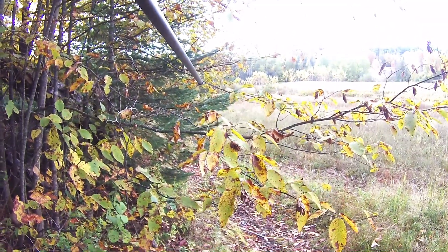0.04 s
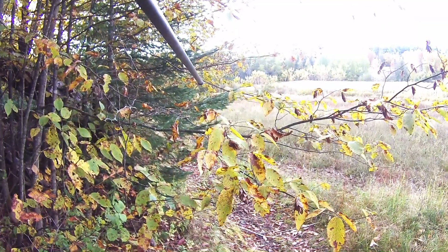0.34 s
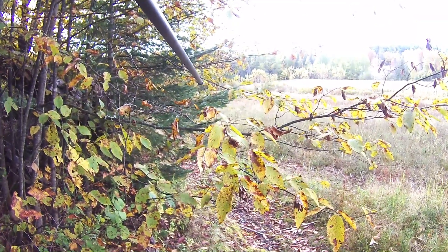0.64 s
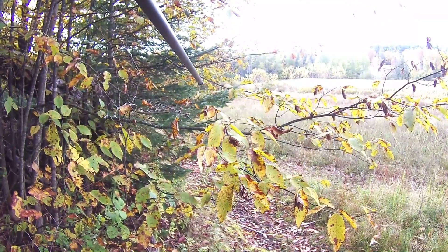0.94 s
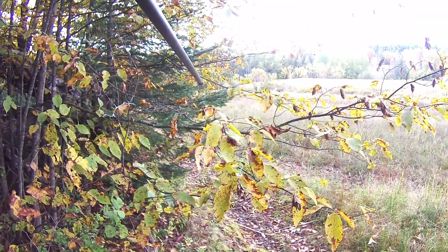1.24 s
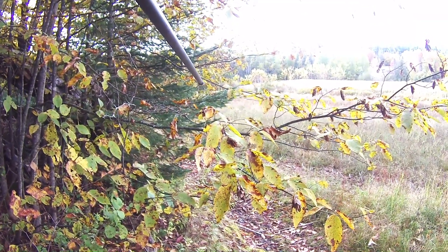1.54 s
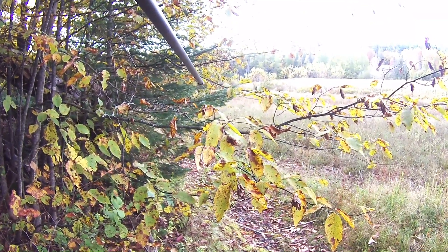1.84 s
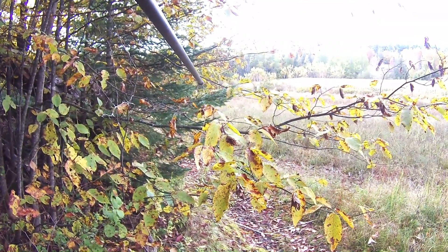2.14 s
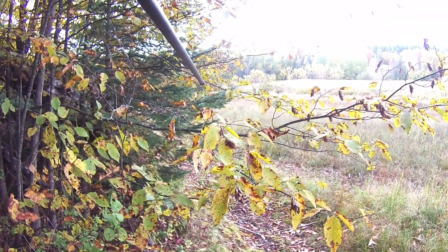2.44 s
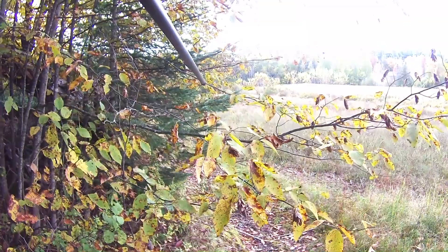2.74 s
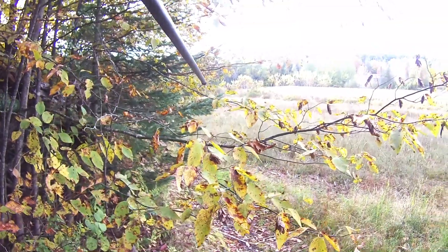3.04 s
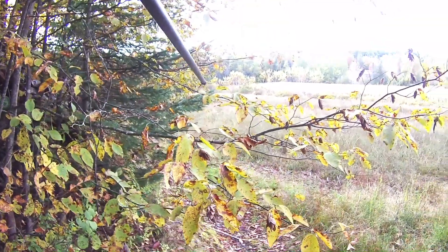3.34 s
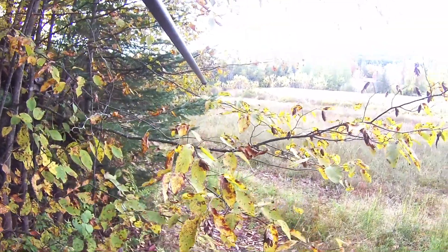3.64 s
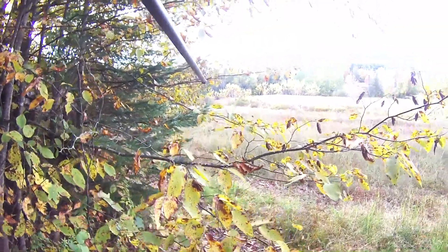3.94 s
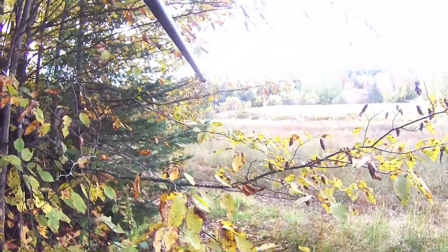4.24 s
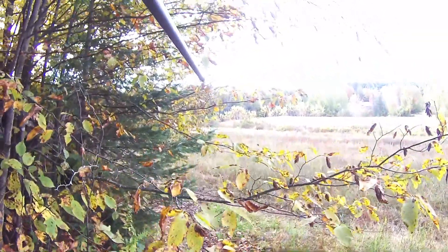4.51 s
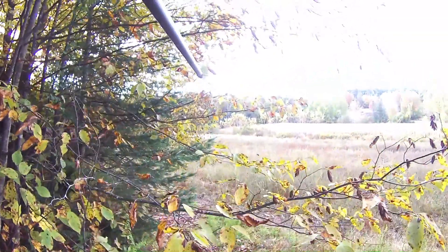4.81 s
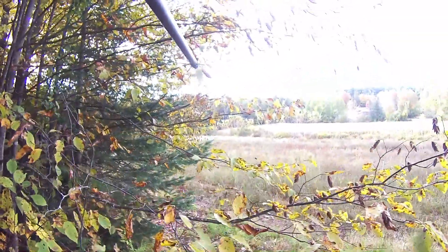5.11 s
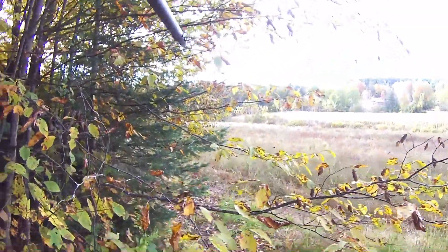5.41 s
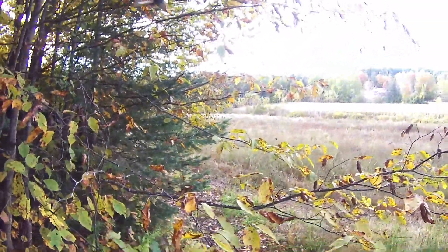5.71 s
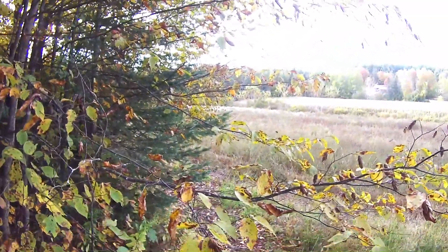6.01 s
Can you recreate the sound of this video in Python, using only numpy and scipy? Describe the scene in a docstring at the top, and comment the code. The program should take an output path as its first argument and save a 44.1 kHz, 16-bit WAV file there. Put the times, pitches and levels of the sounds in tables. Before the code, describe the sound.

An arrow slides back with a ringing hiss as a bow is drawn, ending in loud creaks and knocks, over faint traffic and wind.

```python
"""A bow is drawn at the edge of a wood, heard from a microphone fixed to it.
At first there are only far traffic, low wind, a cricket and a few small birds. From 2.5 s a sleeve
rustles, and sliding friction on the rest makes the arrow hiss and ring at its shaft's resonances.
The hand shifts on the grip, and near 5 s the shaft briefly sings. Towards full draw, impacts excite
the bow's modes: it creaks and knocks hard enough to overload the microphone."""
import sys
import numpy as np
from scipy import signal
from scipy.fft import rfft, irfft, next_fast_len
from scipy.io import wavfile

SR = 44100
rng = np.random.default_rng(int(sys.argv[2]) if len(sys.argv) > 2 else 0)


def store_pcm(level_fs):
    """Save levels as 16-bit WAV."""
    pcm = np.round(np.clip(level_fs, -1, 1) * 32767).astype(np.int16)
    wavfile.write(sys.argv[1], SR, np.atleast_2d(pcm).T)


N = 267687
T = np.arange(N) / SR


# friction following the speed of the draw, in three pulls: (time [s], relative level [dB])
DRAW_FRICTION = [(2.72, -54), (2.88, -48), (3.22, -50.5), (3.33, -53.5), (3.62, -53.5), (3.76, -49.5),
                 (4.1, -48.5), (4.35, -50.5), (5.1, -45.0), (5.45, -44.5), (5.7, -46.5)]
# hiss on the rest: (frequency [Hz], relative spectral density [dB])
HISS_SPECTRUM = [(1400, -20), (2300, -9), (3200, 1), (4500, 3.5), (5500, -0.5), (7000, -6), (9000, -11),
                 (10500, -18), (12000, -19), (15000, -39)]
# main shaft resonances: (frequency [Hz], bandwidth [Hz], gain [dB])
SHAFT_MODES = [(1721, 62, 15.5), (1862, 35, 5.5)]
# higher shaft resonances: (frequency [Hz], bandwidth [Hz], gain [dB])
SHAFT_OVERTONES = [(2606, 190, 1.5), (3182, 130, 4), (4460, 130, -2.5), (5300, 240, 3), (5400, 42, -10),
                   (5970, 140, -5), (7000, 470, -4), (7800, 170, -8.5), (9400, 240, -8),
                   (11670, 1660, -9.5)]

def arrow(start_s=2.43, onset_s=0.18, full_draw_s=6, decay_s=0.93, hiss_db=-1, overtone_db=1, shaft_db=-1):
    """Forced vibration: sliding friction on the rest hisses and drives the modes of the hollow shaft."""
    onset = np.clip((T - start_s) / onset_s, 0, 1)
    fade = np.exp(-np.maximum(T - full_draw_s, 0) / decay_s)
    sliding = from_db(in_time(DRAW_FRICTION)) * onset * fade
    grain = from_db(1.25 * drift(90))
    friction = resonance(rng.standard_normal(N) * grain, hz=1770, width=450)
    shaft = rms_one(sum(from_db(db) * resonance(friction, hz, width) for hz, width, db in SHAFT_MODES))
    # the contact passes the nodes of each overtone, so they swell and fade in turn
    overtones = np.zeros(N)
    for hz, width, db in SHAFT_OVERTONES:
        overtones += from_db(db + 1.8 * drift(11)) * resonance(grain * rng.standard_normal(N), hz, width)
    # further into the draw, more of the friction goes into ringing and less into plain hiss
    ring_share = np.interp(T, [2.7, 5.2], [.12, .65])
    hiss = from_db(hiss_db) * np.sqrt(1 - ring_share) * rms_one(grain * coloured_noise(HISS_SPECTRUM))
    ringing = from_db(overtone_db) * np.sqrt(ring_share) * rms_one(overtones)
    return sliding * (hiss + ringing) + from_db(shaft_db) * shaft_gain(sliding) * shaft


# the shaft catches on the rest: (time [s], relative level [dB])
SHAFT_CATCHES = [(2.89, -49), (3.08, -56), (3.22, -49), (3.47, -46), (3.77, -43), (3.99, -43), (4.08, -43),
                 (4.31, -42.5), (4.55, -40), (4.99, -40), (5.27, -39)]

def shaft_gain(sliding, coupling_db=4.0, antinode_s=4.57, antinode_half_s=0.52, catch_half_s=0.026):
    """Modal coupling: friction drives the main ring most at its antinode, and each catch swells it."""
    coupling = from_db(coupling_db + drift(20)) / np.hypot(1, (T - antinode_s) / antinode_half_s)
    catches = swells([(s, db, catch_half_s) for s, db in SHAFT_CATCHES])
    return np.hypot(sliding * coupling, catches)


def squeal(at_s=5.07, half_s=0.059, pitch_hz=2670, level_db=-50):
    """Sharp resonance: the shaft briefly sings on one overtone."""
    band = resonance(rng.standard_normal(N), pitch_hz, width=90)
    tone = rms_one(resonance(band, pitch_hz, width=78))
    return swells([(at_s, level_db, half_s)]) * tone


# impacts in the bow: (time [s], strength [dB], low-mode boost [dB], relative rebound [dB])
BOW_IMPACTS = [(5.404, -23, 7, -10), (5.425, -21.5, 5, -8), (5.473, -20, 3, -8), (5.509, -22, 13, -13),
               (5.56, -16, 8.5, -6.5), (5.727, -17, 1, -9), (5.7365, -7, 2.5, 0), (5.7669, 3, -0.5, -9),
               (5.7764, 2.5, -2, -24), (5.790, -9, -7, -25), (5.7997, -9.5, 2, -0.5), (5.826, -9.5, 8, -22),
               (5.8621, -10, 8, 2), (5.899, -19, 11, -6), (5.949, -16.5, 3, -5), (6.0001, -4, 6.5, -20),
               (6.042, -15.5, -10, -11), (6.0665, -10, -10, -10)]
# modes of bow and microphone mount: (frequency [Hz], gain [dB], 60 dB decay time [s])
BOW_MODES = [(72, -34.5, 0.14), (213.5, -21, 0.075), (326, -25.5, 0.015), (805, -6, 0.043),
             (909, -11, 0.045), (1300, -8, 0.009), (1540, -7, 0.011), (1760, -9.5, 0.018),
             (2940, -17, 0.022), (3420, -19, 0.029), (4020, -24, 0.029), (4320, -10, 0.015),
             (4840, -25, 0.0059), (6780, -25, 0.0046), (10300, -13, .005)]

def knocks(rebound_s=0.00365, contact_hz=2420, doubling_db=19, thud_below_hz=400, chatter_s=0.0025):
    """Impact excitation: each contact and its rebound ring the modes; harder is shorter and brighter."""
    t = np.arange(2048) / SR
    force = np.zeros((len(BOW_MODES), N + len(t)))
    is_low = np.array(BOW_MODES)[:, 0] < thud_below_hz
    rebounds = [(s + rebound_s, db + rebound_db, thud_db) for s, db, thud_db, rebound_db in BOW_IMPACTS]
    for s, db, thud_db in [row[:3] for row in BOW_IMPACTS] + rebounds:
        contact = (t == 0) + 0.059 * rng.standard_normal(len(t)) * np.exp(-t / chatter_s)
        bright_hz = min(contact_hz * 2 ** (db / doubling_db), SR / 3)
        push = signal.sosfilt(signal.butter(2, bright_hz, fs=SR, output="sos"), contact)
        spot_db = 2 * rng.standard_normal(len(BOW_MODES))  # where it lands sets each mode's share
        shares = from_db(db + thud_db * is_low + spot_db)
        at = min(round(s * SR), N)
        force[:, at:at + len(t)] += np.outer(shares, push)
    return mount(sum(from_db(db) * ring(f[:N], hz, t60) for f, (hz, db, t60) in zip(force, BOW_MODES)))


def mount(x, bend_hz=1500, bend_width_hz=1300, muffle_hz=4300):
    """Dispersion spreads bending waves in time; the mount adds an antiresonance, the housing muffles."""
    r = np.exp(-np.pi * bend_width_hz / SR)
    poles = [1, -2 * r * np.cos(2 * np.pi * bend_hz / SR), r * r]
    for _ in range(2):  # all-pass stages
        x = signal.lfilter(poles[::-1], poles, x)
    notched = x - .85 * resonance(x, hz=2280, width=560)
    return signal.sosfilt(signal.butter(1, muffle_hz, fs=SR, output="sos"), notched)


# the hand shifts on the grip: (time [s], level [dB], half-width [s])
HAND_SHIFTS = [(3.5, -41.5, 0.036), (3.85, -48, 0.074), (4.22, -47, 0.065), (5.55, -35.5, 0.075),
               (5.84, -27, .052), (6.04, -38, .04)]
# rumble of the grip: (frequency [Hz], relative spectral density [dB])
GRIP_SPECTRUM = [(20, 0.5), (36, 5.5), (70, -22), (130, -10), (215, -3.5), (300, -19), (500, -14.5),
                 (820, -22.5), (1200, -20), (2500, -53)]

def grip(shudder_db=2.0):
    """Structure-borne sound: each shift of the hand sends an uneven rumble through the loaded bow."""
    shudder = from_db(shudder_db * drift(50))
    return swells(HAND_SHIFTS) * rms_one(shudder * coloured_noise(GRIP_SPECTRUM))


# rustles, from soft brushes to sharp ticks: (time [s], level [dB], half-width [s])
SLEEVE_RUSTLES = [(2.5475, -42, .0004), (2.5585, -36, .0003), (2.569, -35, .0003), (2.584, -32, .0003),
                  (2.66, -53, .008), (3.21, -51, .02), (3.388, -42, .0005), (3.47, -39, .0008),
                  (3.476, -37, .0006), (3.4947, -31, .0004), (3.498, -37, .0013)]
# rubbing cloth: (frequency [Hz], relative spectral density [dB])
CLOTH_SPECTRUM = [(1500, -16), (3000, -2), (6000, 0), (9000, -6), (12000, -6), (15000, -12)]

def sleeve(grain_db=3):
    """Friction noise: the fibres of stiff cloth give grainy brushes and crisp ticks."""
    fibres = from_db(grain_db * drift(900))
    return swells(SLEEVE_RUSTLES) * rms_one(fibres * coloured_noise(CLOTH_SPECTRUM))


# contact calls: (time [s], duration [s], start pitch [Hz], end pitch [Hz], relative level [dB])
BIRD_NOTES = [(.69, .1, 8350, 8150, -59), (.69, .09, 7500, 7450, -59), (0.933, 0.036, 5430, 4970, -45.5),
              (1.631, .025, 4450, 3620, -44.5), (1.92, .09, 8070, 7950, -55)]

def birds(gain_db=-2.0, waver_hz=90, echo_db=-4.5, echo_s=.12):
    """Frequency modulation makes thin, unsteady notes; scattering by the trees adds a faint tail."""
    notes, waver = np.zeros(N), waver_hz * drift(250)
    for s, length, start_hz, end_hz, db in BIRD_NOTES:
        along = np.clip((T - s) / length, 0, 1)
        phase = 2 * np.pi * np.cumsum(start_hz + (end_hz - start_hz) * along + waver) / SR
        notes += from_db(db + gain_db) * np.sin(np.pi * along) * np.sin(phase)
    trees = (rng.standard_normal(N) * np.exp(-T / echo_s))[:SR // 2]
    echo = signal.fftconvolve(notes, trees / np.linalg.norm(trees))[:N]
    return notes + from_db(echo_db) * echo


def cricket(level_db=-55.5, pitch_hz=4350, fall_hz=1600, strokes_per_s=38):
    """Stridulation: each wing stroke is a short falling tone."""
    stroke = np.cumsum(strokes_per_s * (1 + .2 * drift(30))) / SR % 1
    phase = 2 * np.pi * np.cumsum(pitch_hz + fall_hz * (.5 - stroke) + 60 * drift(40)) / SR
    swell = np.sin(np.pi * stroke) ** 6 * from_db(2 * drift(25))
    return from_db(level_db) * swell * np.sin(phase)


# roar of the far road: (time [s], relative level [dB])
ROAD_LEVEL = [(0.0, -39.5), (0.73, -38), (1.03, -39.5), (2.64, -38.5), (3.17, -43.5), (4.1, -45),
              (5.35, -41.5)]
# distant tyres: (frequency [Hz], relative spectral density [dB])
TYRE_SPECTRUM = [(200, -34), (330, -19.5), (410, -6.5), (500, -8.5), (670, 1), (800, -1), (900, -1.5),
                 (1050, -1.5), (1250, -21), (1700, -42.5)]

def traffic(gain_db=0.1, waver_db=0.7, drone_db=-52, nearest_s=2.74, passing_s=0.66):
    """Spherical spreading: over the tyre roar, one passing drone varies inversely with distance."""
    tyre_db = in_time(ROAD_LEVEL) + gain_db + waver_db * drift(14)
    tyres = from_db(tyre_db) * coloured_noise(TYRE_SPECTRUM)
    drone = rms_one(resonance(rng.standard_normal(N), hz=412, width=45))
    distance = np.hypot(1, (T - nearest_s) / passing_s)  # 1 at closest approach
    return tyres + from_db(drone_db) * drone / distance


# wind and leaves: (frequency [Hz], relative spectral density [dB])
WIND_SPECTRUM = [(20, -1), (33, 3), (52, -4), (78, 1.5), (110, -5.5), (220, -10), (1400, -17),
                 (2300, -22.5), (4400, -25), (6000, -29.5), (9500, -34.5), (11500, -35), (15000, -55)]

def wind(level_db=-43.5):
    """Stationary broadband noise: low wind with a hiss of leaves."""
    return from_db(level_db) * coloured_noise(WIND_SPECTRUM)


def from_db(db):
    """Decibels to amplitude ratio."""
    return 10 ** (np.asarray(db) / 20)


def rms_one(x):
    """Normalisation to unit power."""
    return x / np.sqrt(np.mean(x ** 2) + 1e-20)


def in_time(rows):
    """Linear interpolation of (time [s], level [dB]) at every sample."""
    return np.interp(T, *np.transpose(rows))


def swells(rows):
    """Gaussian envelopes from (time [s], level [dB], half-width [s]); a half-width is one sigma."""
    return sum(from_db(db) * np.exp(-.5 * ((T - s) / half) ** 2) for s, db, half in rows)


def drift(rate):
    """Random modulation of unit power, through `rate` new values a second."""
    knots = rng.standard_normal(4096)
    return rms_one(np.interp(T * rate, np.arange(len(knots)), knots))


def coloured_noise(spectrum):
    """Spectral shaping of white noise, rolled off below 10 Hz and scaled to unit power."""
    hz, db = np.transpose(spectrum)
    size = 2 * next_fast_len(N)
    bins = np.maximum(np.fft.rfftfreq(size, 1 / SR), 1)
    gain = from_db(np.interp(np.log(bins), np.log(hz), db)) * bins / np.hypot(bins, 10)
    return rms_one(irfft(rfft(rng.standard_normal(size)) * gain)[:N])


def resonance(x, hz, width):
    """Driven resonator: a two-pole band-pass, `width` Hz wide, with peak gain 1."""
    r = np.exp(-np.pi * width / SR)
    poles = [1, -2 * r * np.cos(2 * np.pi * hz / SR), r * r]
    return signal.lfilter(np.array([1, 0, -1]) * (1 - r * r) / 2, poles, x)


def ring(force, hz, t60):
    """Damped oscillator: a unit impulse starts a decaying cosine of height 1."""
    r, w = from_db(-60 / (t60 * SR)), 2 * np.pi * hz / SR
    return signal.lfilter([1, -r * np.cos(w)], [1, -2 * r * np.cos(w), r * r], force + 1e-18)


def scene():
    """Superposition: the wood's edge and the bow add in one channel."""
    background = traffic() + wind() + cricket() + birds()
    return (background + arrow() + squeal() + sleeve() + knocks() + grip())[None]


def record(dry):
    """Saturation: the hardest knocks clip, then a steep low-pass cuts the top."""
    low_pass = signal.ellip(10, .1, 70, 15300, fs=SR, output="sos")
    return signal.sosfilt(low_pass, np.clip(dry, -1, 1))


dry = scene()
out = record(dry)
store_pcm(out)
```